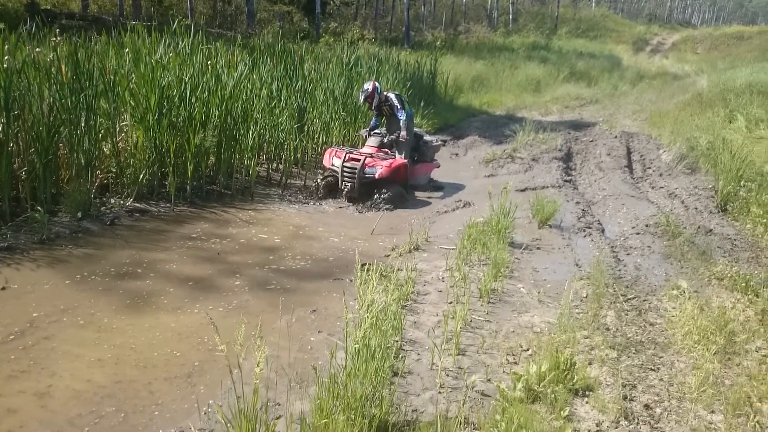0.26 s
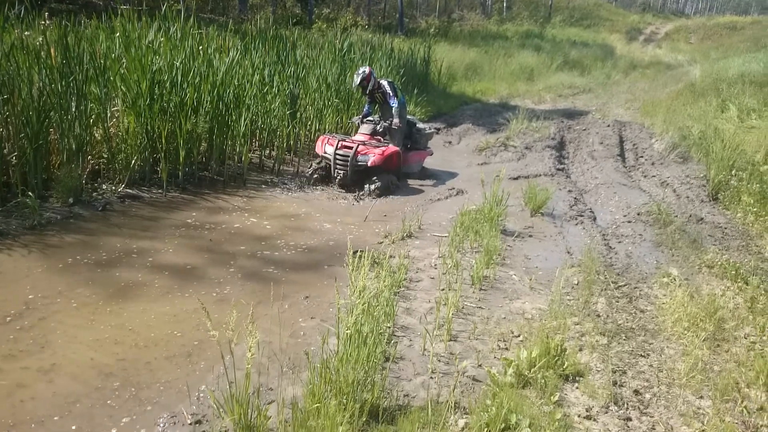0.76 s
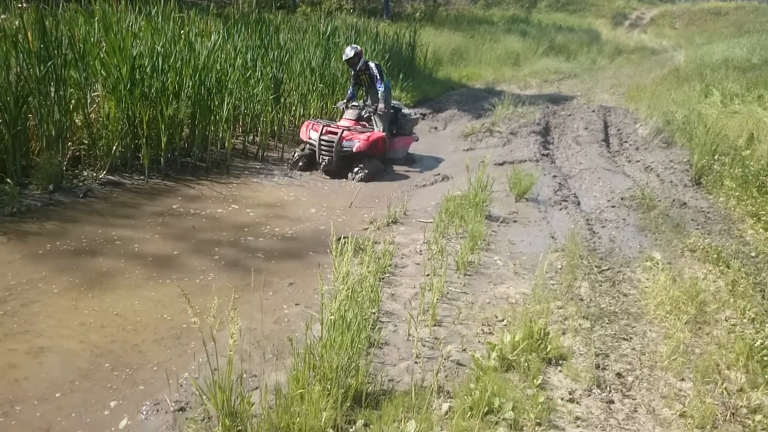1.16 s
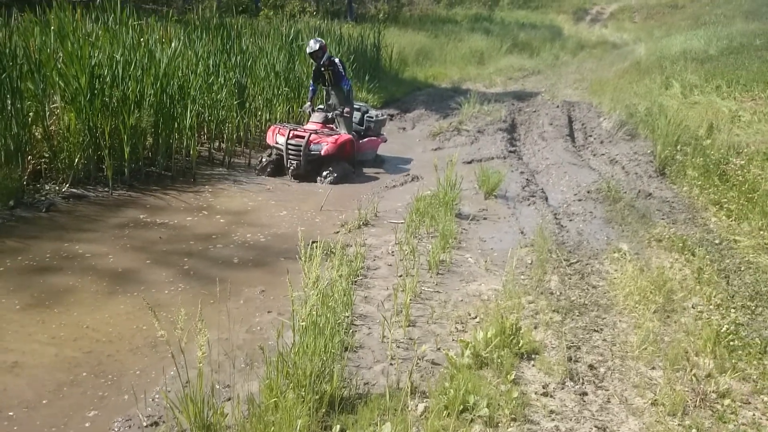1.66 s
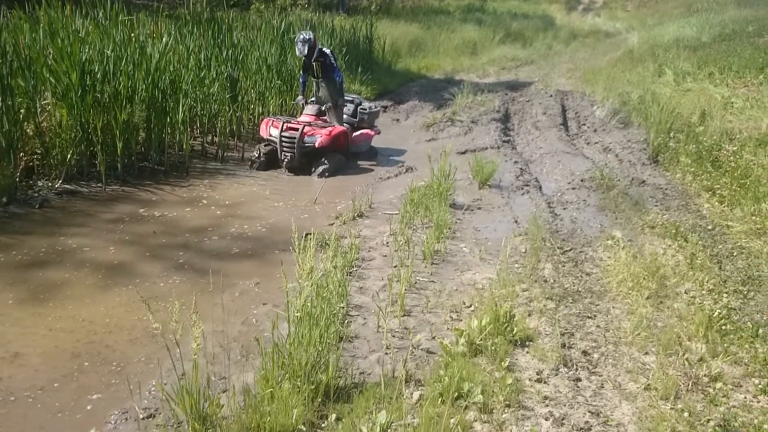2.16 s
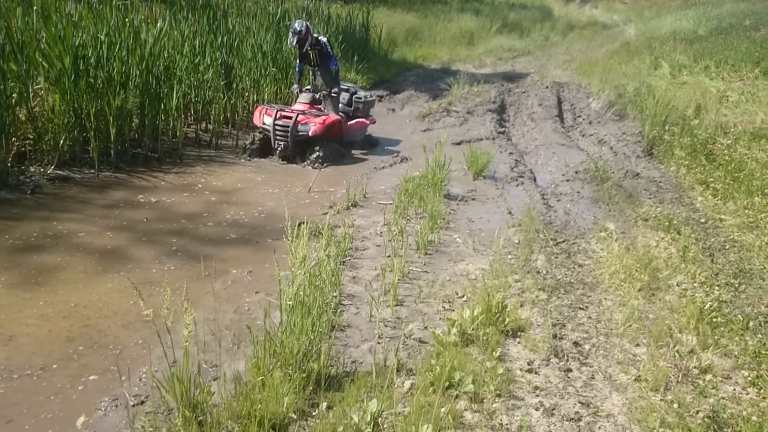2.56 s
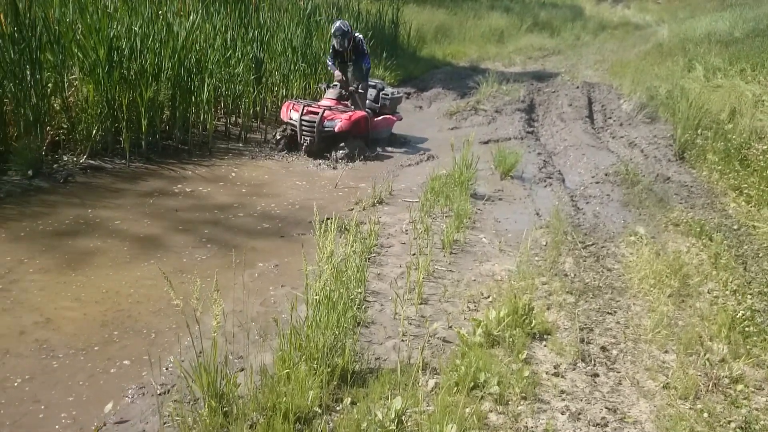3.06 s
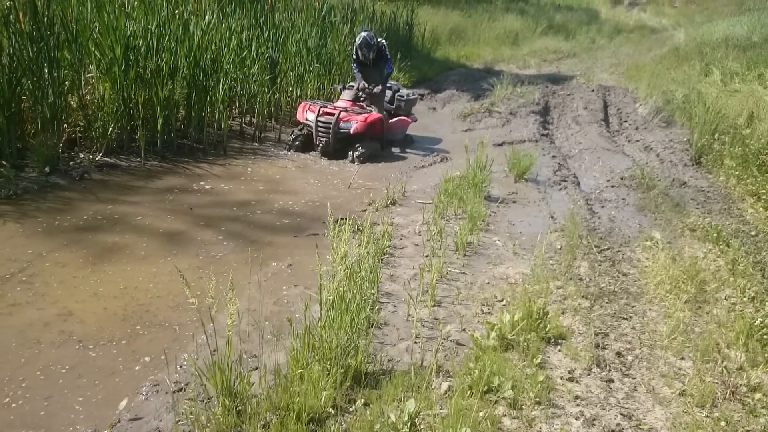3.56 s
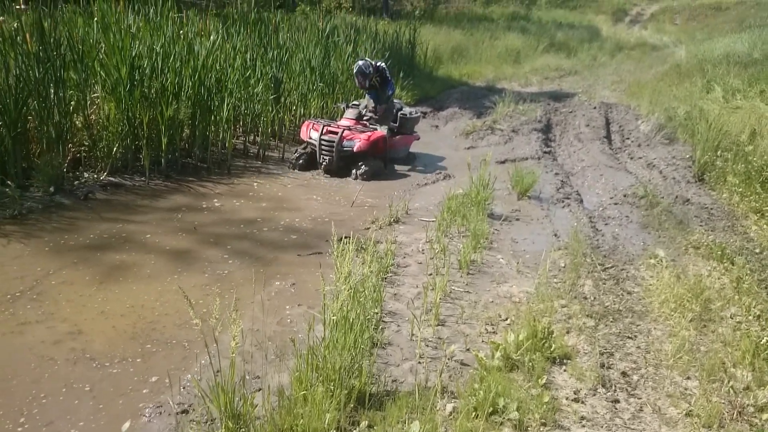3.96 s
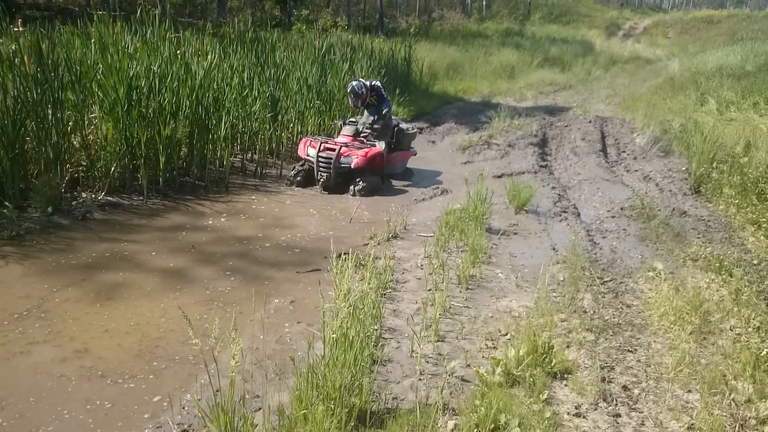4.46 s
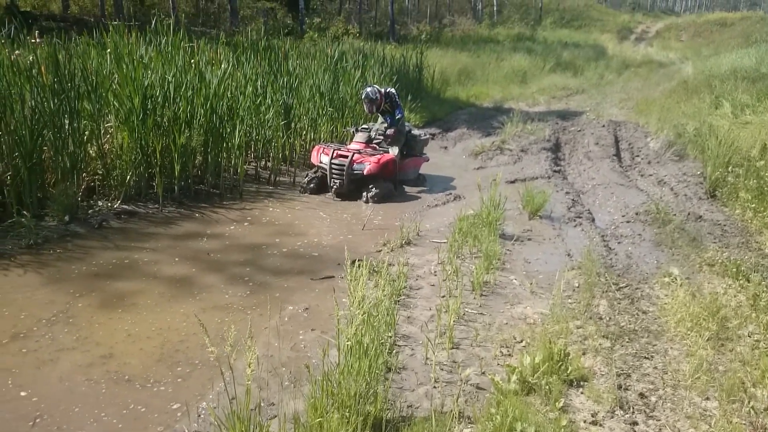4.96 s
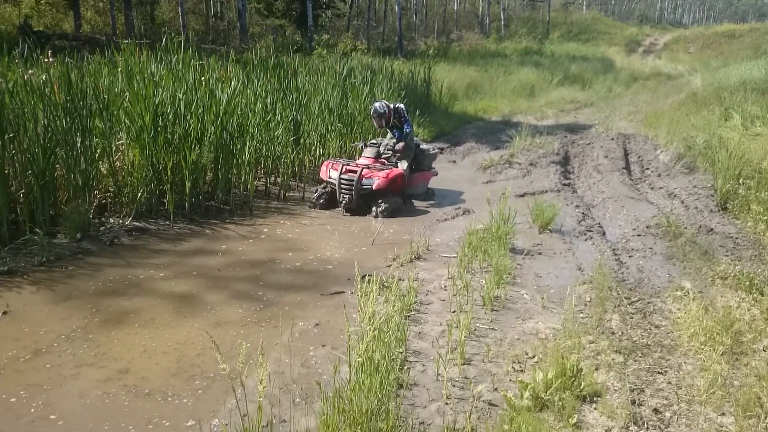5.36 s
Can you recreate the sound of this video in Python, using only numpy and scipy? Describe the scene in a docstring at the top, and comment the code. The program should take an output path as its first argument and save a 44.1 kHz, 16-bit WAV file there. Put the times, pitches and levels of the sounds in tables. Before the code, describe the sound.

Single-cylinder off-road engine surges twice, tyres churning wet mud, before falling back to a quiet putter while an unseen twin engine idles steadily.

```python
"""A single-cylinder quad bike, stuck in a mud hole, revs twice and falls back to idle; its tyres churn and throw water.
Each firing sends returning waves through the exhaust pipe and, on open throttle, puffs out a hiss; its casing rings.
Out of sight a V-twin idles throughout, its pulses repeated by a silencer. Flung drops land as rising bubbles.
Open air over a low rumble, two close microphone ports, the right one louder except around 8 kHz."""
import sys
import numpy as np
from scipy import signal
from scipy.fft import rfft, irfft, next_fast_len
from scipy.io import wavfile
from scipy.ndimage import uniform_filter1d

SR = 44100
rng = np.random.default_rng(int(sys.argv[2]) if len(sys.argv) > 2 else 0)


def wav_out(sig):
    """Save sig, one row per channel (or a flat mono array), as 16-bit PCM at SR to the path in sys.argv[1]."""
    wavfile.write(sys.argv[1], SR, np.round(np.clip(np.atleast_2d(sig).T, -1, 1) * 32767).astype(np.int16))


def level_to_linear(level):
    """Convert decibel levels to linear amplitude factors, elementwise."""
    exponent = np.asarray(level, float) / 20
    return 10 ** exponent


N = 246959

# Speed of the single: (time [s], firings [1/s])
SINGLE_SPEED = [(0, 23.03), (.42, 23.95), (.65, 17.16), (.91, 14.03), (1.17, 16.53), (1.79, 19.2),
                (2.18, 19.24), (2.3, 21.46), (2.51, 22.63), (2.65, 29.38), (2.75, 23.02), (2.93, 14.12),
                (3.35, 9.59), (3.81, 10.69), (5.6, 10.9)]
# Load on the single, heard as exhaust thump: (time [s], relative level [dB])
THUMP_LEVEL = [(0, -23.5), (.45, -27.5), (.6, -31), (1.05, -33.5), (1.2, -29), (1.75, -26), (2.4, -27),
               (2.58, -21.5), (2.76, -25.5), (3.05, -41), (4.2, -38), (4.7, -37), (5.6, -38)]
# Hiss and spray from the single: (time [s], level [dB])
HISS_LEVEL = [(0, -31.5), (.6, -35), (.9, -38.5), (1.05, -45), (1.25, -48), (1.8, -40.5), (2.16, -42.5),
              (2.26, -33), (2.35, -31.5), (2.65, -29), (2.78, -33.5), (2.95, -34), (3.06, -31.5),
              (3.15, -35), (3.3, -47.5), (3.55, -58), (4.1, -60), (5.4, -59), (5.6, -54)]
# With the throttle open the hiss comes in puffs; shut, the spray is steady: (time [s], power share in puffs [0-1])
PUFF_SHARE = [(0, 0.17), (1.05, 0.06), (1.22, 0.86), (1.4, 0.94), (2.45, .99), (2.65, 0.35), (2.77, 0.01),
              (5.6, 0.02)]
# Tyres churning the mud: (time [s], level [dB])
CHURN_LEVEL = [(0, -36.5), (.5, -36), (.75, -38.5), (1.15, -50.5), (1.6, -46), (2.15, -47.5), (2.25, -43.5),
               (2.65, -36), (3.05, -39), (3.3, -53), (3.6, -60), (5.4, -58.5), (5.6, -52)]
# Successive returns of the wave in the pipe: (relative gain when damped, relative gain when ringing)
PIPE_RETURNS = [(.7, .55), (1.3, .45), (.35, 1.1), (.15, 1.1), (.05, .55), (.02, .2)]
# The same returns at full throttle, the third cracking hardest: (relative gain)
PIPE_FULL_THROTTLE = [0.87, 0.55, 1.86, 0.75, 0.23, 0.049]
# Chamber after the pipe, one row: (centre [Hz], width [Hz], level [dB])
CHAMBER = (245, 55, -9)
# Sharp edge of each thump, one row: (centre [Hz], width [Hz], level [dB])
THUMP_EDGE = (394, 173, -29)
# Engine casing and guards, each resonance applied twice: (centre [Hz], width [Hz], level per pass [dB])
CASING_MODES = [(1830, 83, 8), (2200, 280, 3.5), (2420, 140, 7), (3660, 270, 5.5), (4440, 130, 9),
                (4690, 79, 11), (5484, 320, 8)]
# Colour of the hiss: (frequency [Hz], relative density [dB])
HISS_SPECTRUM = [(350, -2.5), (600, -5.5), (688, -1), (788, -23), (1170, 2), (1620, -7.5), (1960, 0.5),
                 (2540, 2), (2910, 0.5), (4040, 2), (5450, 6.5), (8200, -11.5), (10600, -14.5),
                 (15600, -18.5)]
# Colour of the mud wash: (frequency [Hz], relative density [dB])
MUD_SPECTRUM = [(250, -89), (400, 3.5), (650, 8), (1200, 4.5), (2200, 5.5), (4000, -13.5), (8000, -20.5)]
# Colour of the valve gear: (frequency [Hz], relative density [dB])
CLATTER_SPECTRUM = [(210, -8), (350, 13.5), (430, -22), (466, 20), (512, -17), (630, 14.5), (812, -17),
                    (1130, 8), (1370, -15), (2320, 8), (3130, 1), (5540, 2.5), (7620, -95), (15600, -75)]
# The twin's idle hunts a little: (time [s], four-stroke cycles [1/s])
TWIN_IDLE = [(0, 9.36), (1.3, 9.29), (2.8, 9.43), (4.3, 9.29), (5.6, 9.55)]
# Repeats from the twin's silencer: (delay [ms], gain)
TWIN_SILENCER = [(0, 0.96), (19, 0.5), (38, 0.23)]
# The twin's tail pipe, one row: (centre [Hz], width [Hz], level [dB])
TWIN_TAIL_PIPE = (252.7, 43, -16.5)
# Colour of the low rumble: (frequency [Hz], relative density [dB])
RUMBLE_SPECTRUM = [(12, -53), (20, -26), (107, -11), (127, -31), (161, -32), (247, 9.5), (364, -17),
                   (544, -32), (700, -19), (910, -78), (1540, -120)]
# Flung drops landing: (time [s], level [dB], starting pitch [Hz])
LANDING_DROPS = [(0.8878, -21, 1300), (0.9163, -16, 2490), (0.9566, -18, 5350), (3.027, -14.5, 5560),
                 (3.2435, -21, 4650), (3.394, -40, 2540), (3.5478, -58, 1280)]
# Likeness of the noises at left and right: (frequency [Hz], coherence [0-1])
LIKENESS = [(100, 0.39), (700, 1), (1400, 0.96), (3000, 0.11), (6000, 0.077), (12000, 0.28)]
# Level difference of the microphone ports: (frequency [Hz], left minus right [dB])
PORT_BALANCE = [(40, -5), (85, -3.2), (200, -2.5), (700, -2.6), (1290, -5.5), (2380, -7.5), (4400, -6.5),
                (8120, 1.5), (15000, -1.5)]
# Phase difference of the microphone ports: (frequency [Hz], left leads by [rad])
PORT_LEAD = [(30, 0.13), (85, 0.75), (180, 0.21), (700, 0.45), (1400, 0.85), (2200, 0.81), (4000, 3.42),
             (8000, 6.05), (15000, 12.8)]

FIRST_FIRING_S, TWIN_FIRST_S = .0262, .0165
IDLE_PER_S = 11  # firings per second of the single
TRIP_MS, TRIP_SHORTENS_MS = 9.6, 1.1  # basic round trip in the pipe, and its loss at full throttle
RING_IDLE, RING_COAST, RING_FAST = .25, .1, .55  # pipe ringing 0-1 at 1, 1.4 and 2.4 times idle speed
FULL_THROTTLE_DB = -30  # reference level for the exhaust gas hiss
CLATTER_DB, TWIN_DB, RUMBLE_DB = -53, -29, -45
PORT_LOW_HZ = 29


def unit(x):
    """Scales to rms 1."""
    return x / np.sqrt(np.mean(x ** 2) + 1e-20)


def along(points, hz):
    """Reads a (Hz, value) table on a log frequency axis."""
    f, value = np.transpose(points)
    return np.interp(np.log(hz + 1), np.log(f + 1), value)


def curve(rows):
    """Draws a (time, value) table as one value per sample."""
    return np.interp(np.arange(N) / SR, *np.transpose(rows))


def filtered(x, response):
    """Multiplies the spectrum of x by a complex response of frequency."""
    size = next_fast_len(N + SR // 2)
    return irfft(rfft(x, size) * response(np.fft.rfftfreq(size, 1 / SR)), size)[..., :N]


def resonance(hz, centre_hz, width_hz, db):
    """Response of a causal resonance, db high at its centre."""
    return level_to_linear(db) * 1j * hz * width_hz / (centre_hz ** 2 - hz ** 2 + 1j * hz * width_hz)


def rush(spectrum, patchy_db):
    """Stereo noise of rms 1, patchy in time and frequency, with partly alike sides."""
    noise = signal.stft(rng.standard_normal((2, N)), nperseg=512)[2]
    patches = uniform_filter1d(rng.standard_normal(noise.shape[1:]), size=5, axis=0)
    patches = unit(uniform_filter1d(patches, size=4, axis=1))
    pair = signal.istft(noise * level_to_linear(patchy_db * patches), nperseg=512)[1][:, :N]

    def colour(hz):
        # half the angle whose cosine is the coherence shares power between mid and side
        angle = np.arccos(np.clip(along(LIKENESS, hz), 0, 1)) / 2
        return level_to_linear(along(spectrum, hz)) * [np.cos(angle), np.sin(angle)]

    mid, side = filtered(pair, colour)
    return unit(np.array([mid + side, mid - side]))


def firing_times(crank, offset, jitter_ms, scatter_db):
    """Moments (s) when the crank passes a firing point, each a little early or late, and their strengths."""
    speed, first_s = crank
    s = np.arange(-.3, N / SR + .3, .001)
    turns = np.cumsum(np.interp(s, *np.transpose(speed))) / 1000
    turns = turns - np.interp(first_s, s, turns)
    whole = np.arange(-2, int(turns[-1]) - 1)
    luck = rng.standard_normal((len(whole), 2))
    times = np.interp(whole + offset, turns, s) + jitter_ms / 1000 * luck[:, 0]
    return times, level_to_linear(scatter_db * luck[:, 1])


def spikes(s, size):
    """One-sample pulses at the given moments."""
    at = np.round(np.ravel(s) * SR).astype(int)
    heard = (at >= 0) & (at < N)
    return np.bincount(at[heard], np.ravel(size)[heard], N)


def firings(crank, offset, jitter_ms, scatter_db):
    """A spike for each firing."""
    return spikes(*firing_times(crank, offset, jitter_ms, scatter_db))


def exhaust(s, size):
    """Each firing sends a suction wave up and down the pipe; hotter, faster gas makes the trip sooner."""
    thump_db = np.interp(s, *np.transpose(THUMP_LEVEL))[:, None]
    speed = np.interp(s, *np.transpose(SINGLE_SPEED))[:, None]
    puffing = np.interp(s, *np.transpose(PUFF_SHARE))
    hiss_db = np.interp(s, *np.transpose(HISS_LEVEL))
    gas = np.sqrt(np.abs(puffing)) * level_to_linear(hiss_db - FULL_THROTTLE_DB)
    throttle = np.clip(1.266 * gas - .3, 0, 1)[:, None]

    ringing = np.interp(speed / IDLE_PER_S, [1, 1.4, 2.4], [RING_IDLE, RING_COAST, RING_FAST])
    damped, rung = np.transpose(PIPE_RETURNS)
    gains = damped + np.clip(ringing, 0, 1) * (rung - damped)
    gains = gains + throttle * (np.array(PIPE_FULL_THROTTLE) - gains)
    gains = gains * level_to_linear(1.2 * rng.standard_normal(gains.shape))
    gains = gains / np.linalg.norm(gains, axis=1, keepdims=True)
    # faster running shares the level among more firings
    share = level_to_linear(thump_db) * np.sqrt(SR / speed) * size[:, None]

    # away from idle speed, or on throttle, each trip is shorter than the last: the pitch climbs within a thump
    trip_ms = TRIP_MS - TRIP_SHORTENS_MS * throttle
    shrink = 1 - 0.0047 * np.abs(speed - IDLE_PER_S) - 0.062 * throttle
    trips = np.cumsum(shrink ** np.arange(len(PIPE_RETURNS)), axis=1) - 1
    wobble_ms = .35 * rng.standard_normal(trips.shape)
    returns = spikes(s[:, None] + (trip_ms * trips + wobble_ms) / 1000, share * gains)

    def outlet(hz):
        body = np.exp(-(hz / 185) ** 5.1) * (1j * hz / 55) ** 2 / (1 + 1j * hz / 55) ** 2
        chamber = resonance(hz, *CHAMBER) * np.exp(-(hz / 330) ** 4)
        edge = resonance(hz, *THUMP_EDGE) * np.exp(-(hz / 800) ** 4)
        return -body * np.exp(-.6j) - chamber - edge

    return level_to_linear(27) * filtered(returns, outlet)  # makes up for the pipe's narrow pass band


def casing(level_db):
    """Four knocks a cycle ring the casing, each mode at a new strength every time."""
    crank = SINGLE_SPEED, FIRST_FIRING_S
    knocks = [firing_times(crank, offset=0.14 + k / 4, jitter_ms=3, scatter_db=0)[0] for k in range(4)]
    s = np.concatenate(knocks)
    strength = level_to_linear(3 * rng.standard_normal((len(s), len(CASING_MODES))))
    ring = np.zeros(N)
    for k, mode in enumerate(CASING_MODES):
        ring += filtered(spikes(s, strength[:, k]), lambda hz: resonance(hz, *mode) ** 2)
    # hold a steady running level
    return level_to_linear(level_db) * ring / np.sqrt(np.abs(uniform_filter1d(ring ** 2, size=SR // 2)) + 1e-12)


def puff_gate(s, size):
    """Gas leaves at once after each firing, then tails off; the running level is evened out."""
    t = np.arange(SR // 8) / SR
    puff = (1 - np.exp(-t / 0.0014)) * np.exp(-t / 0.018)
    gate = np.convolve(spikes(s, size), puff)[:N]
    return gate / np.sqrt(np.abs(uniform_filter1d(gate ** 2, size=SR // 5)) + 1e-9)


def mud():
    """Tyres churn the slurry: a patchy wash with short decaying tones splashing on top."""
    luck = rng.random((4000, 3))
    t = np.arange(128) / SR
    hz = 500 * 12 ** luck[:, 1:2]
    strength = level_to_linear(-3 * np.log(luck[:, 2:] + .05))
    grain = np.sin(2 * np.pi * hz * t) * np.exp(-t * hz / 2.5) * strength
    at = (luck[:, :1] * N).astype(int) + np.arange(len(t))
    splash = np.bincount(at.ravel(), grain.ravel(), N + len(t))[:N]
    return rush(MUD_SPECTRUM, patchy_db=2) + .35 * unit(splash)


def valve_gear():
    """Four valve events a cycle clatter: short decays shape noise and the ringing casing."""
    crank = SINGLE_SPEED, FIRST_FIRING_S
    ticks = np.zeros(N)
    for k, gain in enumerate([1.66, 1.24, 0.29, 0.87]):
        ticks += gain * firings(crank, offset=k / 4, jitter_ms=2, scatter_db=2.0)
    t = np.arange(SR // 8) / SR
    envelope = unit(np.convolve(ticks, np.exp(-t / .012))[:N] + .18)
    return level_to_linear(CLATTER_DB) * envelope * (rush(CLATTER_SPECTRUM, patchy_db=2.5) + casing(-2.5))


def single():
    """The stuck engine: each firing thumps and, on open throttle, swells hiss and mud over the valve gear."""
    s, size = firing_times((SINGLE_SPEED, FIRST_FIRING_S), offset=0, jitter_ms=.3, scatter_db=1.2)
    hiss_db = curve(HISS_LEVEL)
    pulsed = np.clip(curve(PUFF_SHARE), 0, 1)
    flow = np.sqrt(pulsed) * puff_gate(s, size) + np.sqrt(1 - pulsed)
    hiss = level_to_linear(hiss_db) * rush(HISS_SPECTRUM, patchy_db=2.2)
    hiss = hiss + np.sqrt(pulsed) * casing(hiss_db - 4)
    churn = level_to_linear(curve(CHURN_LEVEL)) * mud()
    return exhaust(s, size) + flow * (hiss + churn) + valve_gear()


def twin():
    """Two cylinders fire 270 and 450 degrees apart; each pulse returns from the silencer and barks in the tail pipe."""
    crank = TWIN_IDLE, TWIN_FIRST_S
    front = .75 * firings(crank, offset=0, jitter_ms=.5, scatter_db=1.5)
    rear = firings(crank, offset=3 / 8, jitter_ms=.5, scatter_db=1.5)

    def pipework(hz):
        swing = 1j * hz / 100 * np.exp(-(hz / 118) ** 4.06 - .15j)  # one slow push and pull
        bark = resonance(hz, *TWIN_TAIL_PIPE) * np.exp(-(hz / 450) ** 3)
        echoes = sum(gain * np.exp(-2j * np.pi * hz * ms / 1000) for ms, gain in TWIN_SILENCER)
        return (swing + bark) * echoes

    return level_to_linear(TWIN_DB) * unit(filtered(front + rear, pipework))


def rumble():
    """Low patchy random noise beneath the engines."""
    return level_to_linear(RUMBLE_DB) * rush(RUMBLE_SPECTRUM, patchy_db=3)


def drops():
    """Each drop is a bubble whose pitch rises as it dies, with a short noise tick at its start."""
    out, t = np.zeros(N + SR), np.arange(SR // 20) / SR
    for s, db, hz in LANDING_DROPS:
        tone = np.sin(2 * np.pi * hz * t * (1 + 6 * t))
        bubble = tone * np.exp(-t / 0.0023) * (1 - np.exp(-t / 0.00015))
        tick = 0.11 * rng.standard_normal(len(t)) * np.exp(-t / 0.00051)
        out[round(s * SR):][:len(t)] += level_to_linear(db) * (bubble + tick)
    return out[:N]


def scene():
    """Sums both engines, the low rumble and the drops."""
    return single() + twin() + rumble() + drops()


def band_limit(x):
    """A steep low-pass at the top of the band."""
    return signal.sosfilt(signal.butter(12, 15710, fs=SR, output="sos"), x)


def record(dry):
    """The two close microphone ports differ in colour and phase and lose the deepest bass."""
    side = np.array([[.5], [-.5]])  # half of each difference to the left, half to the right

    def ports(hz):
        balance = level_to_linear(side * along(PORT_BALANCE, hz))
        lead = np.exp(1j * side * along(PORT_LEAD, hz))
        low_cut = 1 / np.sqrt(1 + (PORT_LOW_HZ / (hz + 1)) ** 4)
        return balance * lead * low_cut

    mix = filtered(dry, ports)
    return band_limit(mix)


dry = scene()
out = record(dry)
wav_out(out)
```